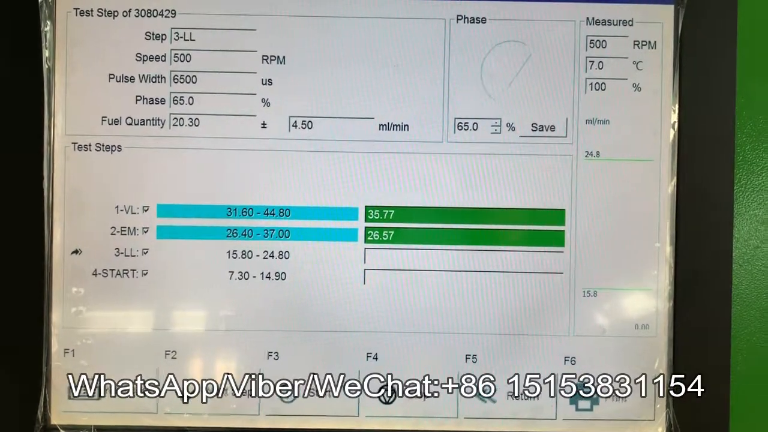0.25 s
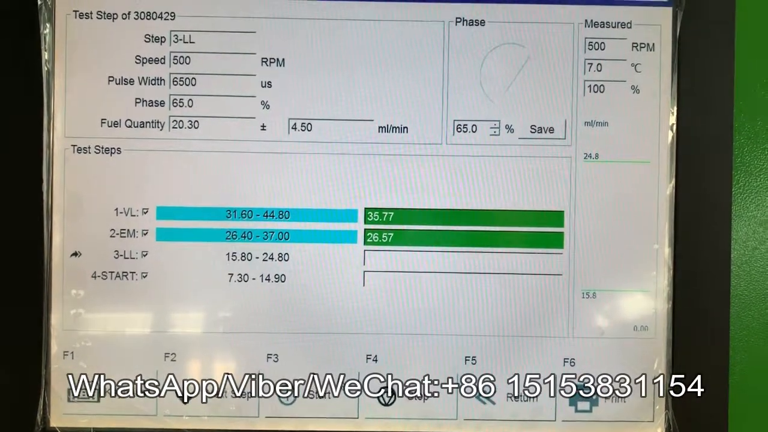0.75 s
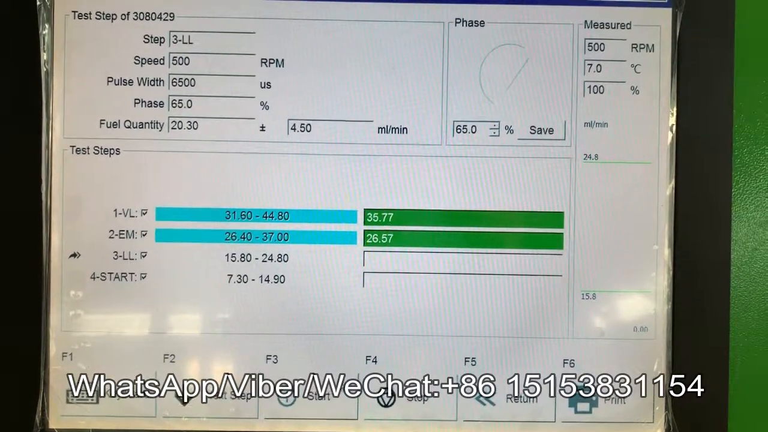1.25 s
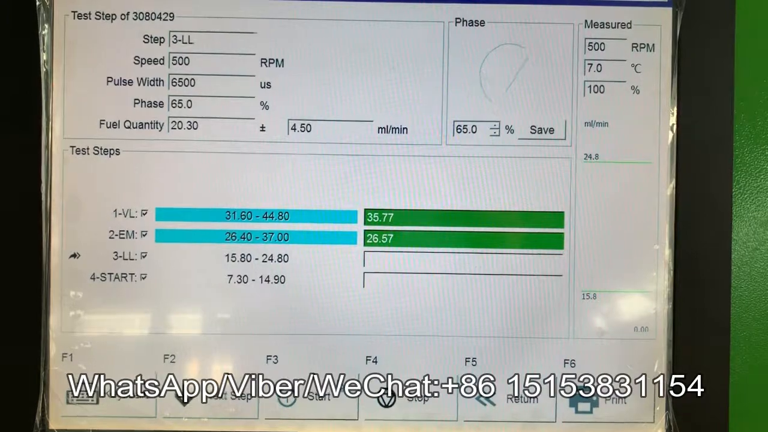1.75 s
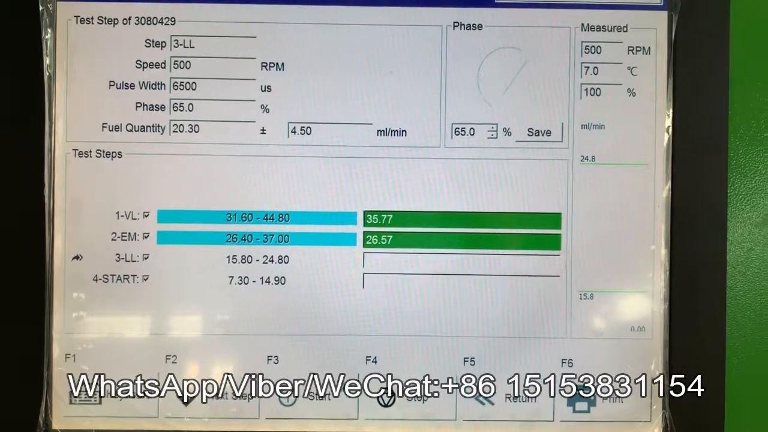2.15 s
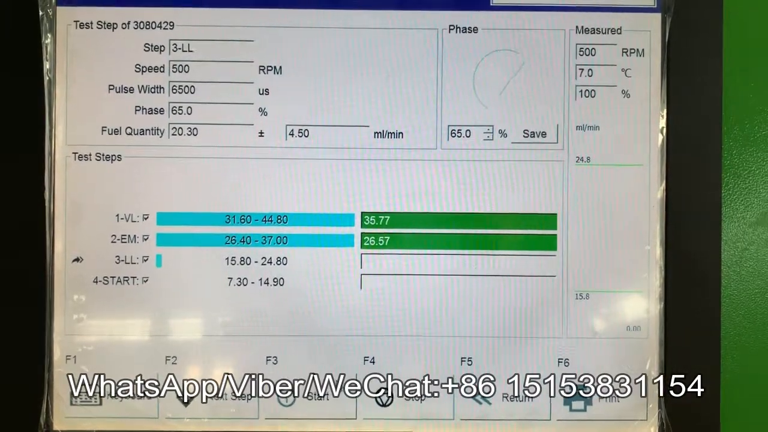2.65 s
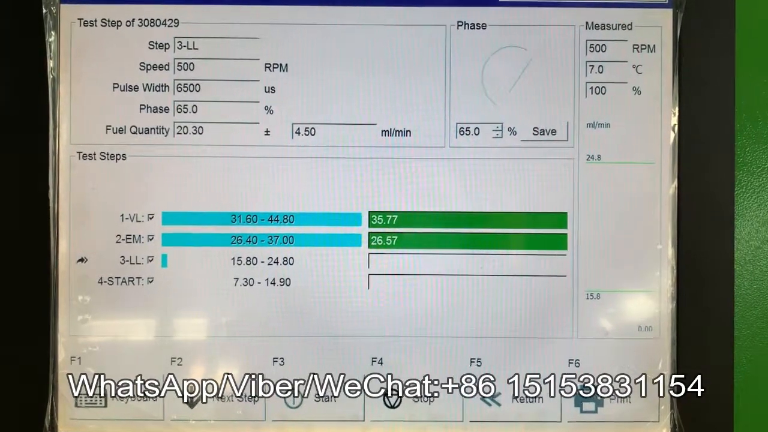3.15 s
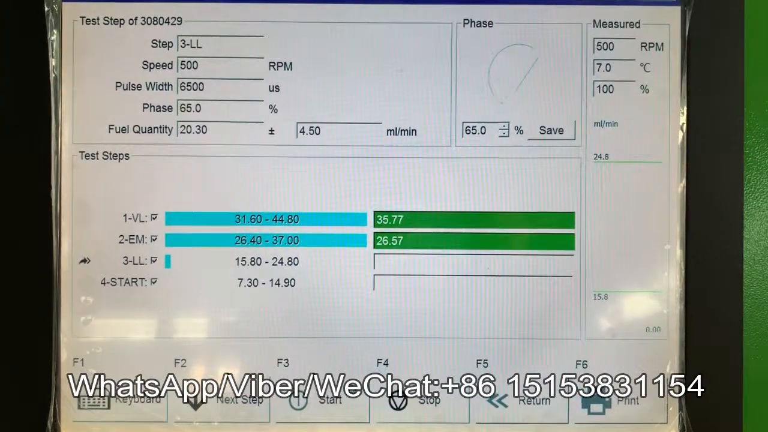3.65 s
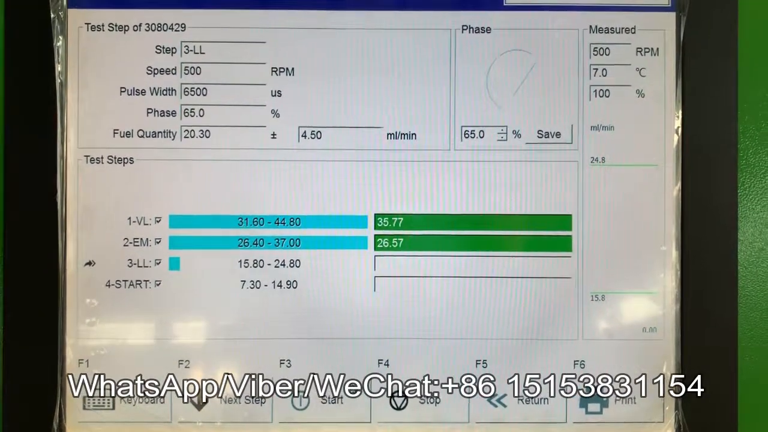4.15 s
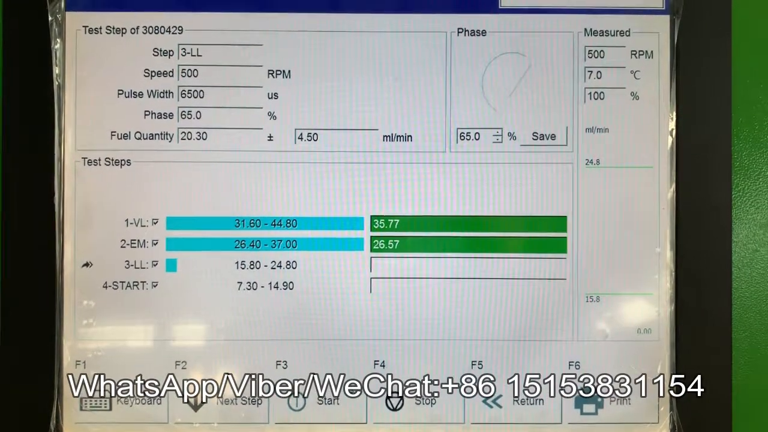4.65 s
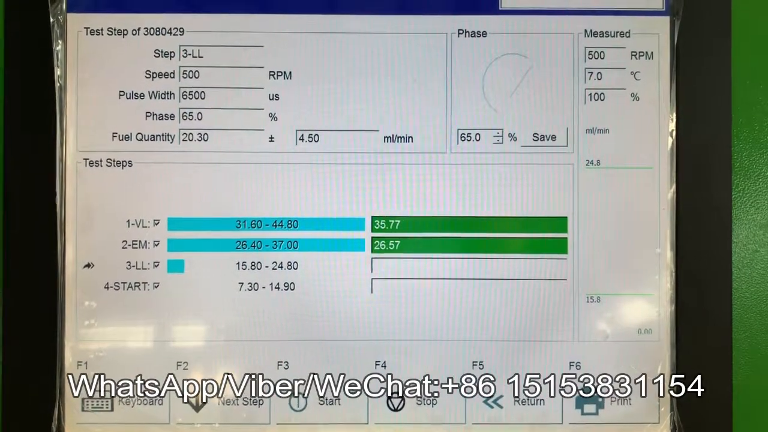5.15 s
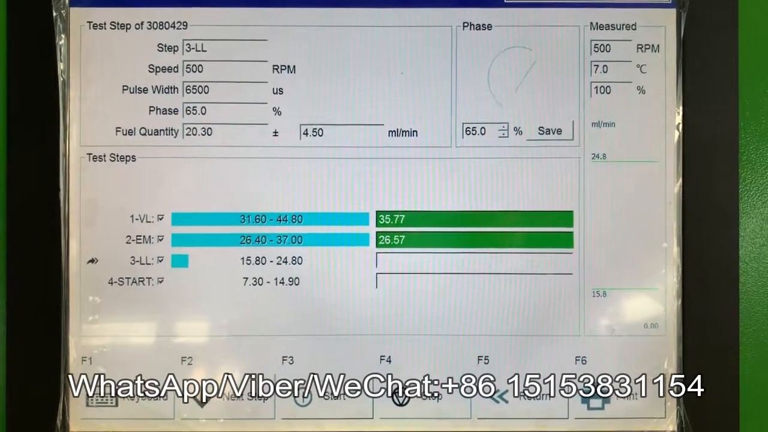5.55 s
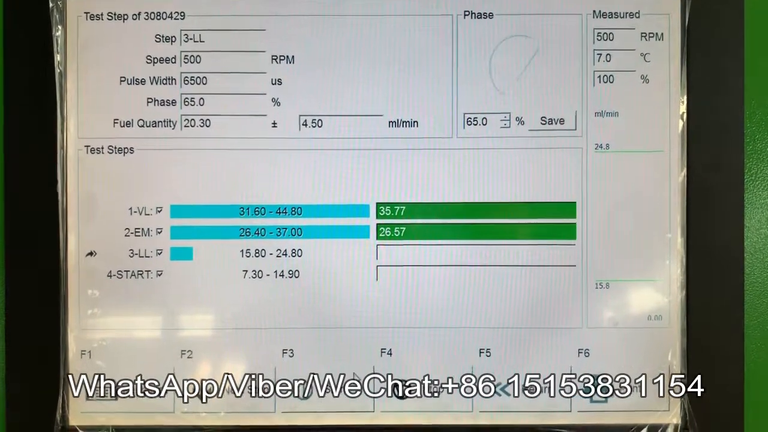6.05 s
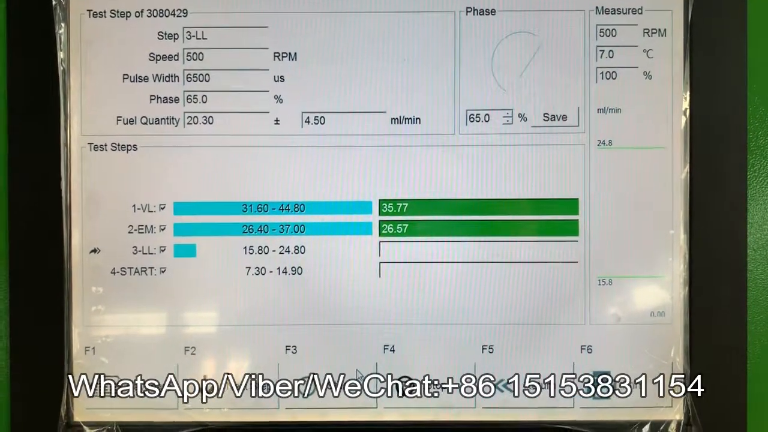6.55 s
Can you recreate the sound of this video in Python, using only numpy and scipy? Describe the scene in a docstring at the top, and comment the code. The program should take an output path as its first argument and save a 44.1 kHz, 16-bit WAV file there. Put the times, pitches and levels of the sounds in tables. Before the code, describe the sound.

Rapid, even mechanical knocking with bright clicks and ringing metal, above constant machine drone, oil hiss and faint distant rushing swells.

```python
"""A hard tick and thump recur about eight times a second: a diesel injector on a workshop test bench,
fired once a turn by a cam at 500 rpm. Valve contacts ring the steel, pressure pushes shake the frame's modes.
Between strokes the drive gear whines by tooth mesh, sagging and recovering with the cam load.
Motor and pump hum in steady tones, an inverter sings high up, oil hisses and thin metal squeaks;
behind them swells of filtered noise and a few low falling groans come from the hall."""
import sys
import numpy as np
from scipy import signal
from scipy.fft import rfft, irfft, next_fast_len
from scipy.io import wavfile
from scipy.ndimage import uniform_filter1d, map_coordinates

SR = 44100
rng = np.random.default_rng(int(sys.argv[2]) if len(sys.argv) > 2 else 0)


def write(x):
    x = np.atleast_2d(x).T
    wavfile.write(sys.argv[1], SR, np.round(np.clip(x, -1, 1) * 32767).astype(np.int16))

N = 300321  # samples
SHIFT_S = 5.33  # from here on the frame rings with another balance of its modes


def amp(db):
    """Level law: decibels to an amplitude ratio."""
    return 10 ** (np.asarray(db) / 20)


def unit(x):
    """Normalisation: scale a signal to rms 1."""
    return x / np.sqrt(np.mean(x ** 2) + 1e-20)


def along(points, hz):
    """Interpolation of (frequency [Hz], value) points on a logarithmic frequency axis."""
    f, v = np.transpose(points)
    return np.interp(np.log(hz + 1), np.log(f), v)


def curve(rows, x):
    """Linear interpolation of every column over the first one, read at x."""
    knots, *columns = np.transpose(rows)
    return [np.interp(x, knots, column) for column in columns]


def wobble(rate):
    """Band-limited random modulation: a smooth curve through `rate` random knots a second."""
    knots = rng.standard_normal(int(N * rate / SR) + 4)
    return map_coordinates(knots, [np.arange(N) * rate / SR])


def filtered(x, response):
    """Linear filtering: multiply the spectrum of x by a response of frequency."""
    m = next_fast_len(N + SR // 4)
    return irfft(rfft(x, m) * response(np.fft.rfftfreq(m, 1 / SR)), m)[..., :N]


def white():
    """White noise: two unrelated channels."""
    return rng.standard_normal((2, N))


def bell(t, centre, half):
    """Gaussian envelope, falling to 1/e at `half` seconds from its centre."""
    return np.exp(-((t - centre) / half) ** 2)


def resonances(modes, hz):
    """Modal superposition: response of damped modes (frequency [Hz], width [Hz], level [dB])."""
    total = 0
    for k, (centre, width, db) in enumerate(modes):
        damping = 1j * hz * width
        total = total + (-1) ** k * amp(db) * damping / (centre * centre - hz * hz + damping)
    return total


# likeness of the left and right sound in a diffuse field: (frequency [Hz], coherence [1])
COHERENCE = [(30, 1), (120, 0.93), (280, 0.9), (550, 0.97), (1000, 0.71), (2000, 0.51), (5000, 0.038),
             (8000, 0.59), (10500, 1), (14000, 0.86)]


def spread(pair, spectrum):
    """Interaural coherence: mix two unrelated signals into one coloured stereo sound of rms 1."""
    def mid_side_gain(hz):
        turn = np.arccos(np.clip(along(COHERENCE, hz), -1, 1)) / 2
        return amp(along(spectrum, hz)) * [np.cos(turn), np.sin(turn)]

    mid, side = filtered(pair, mid_side_gain)
    return unit(np.array([mid + side, mid - side]))


def ringing(age, rise, t60, repeat, count=6):
    """High modal density: noise struck once a turn, a share of its power alike in every turn."""
    t = np.arange(int(age.max() * SR) + 1) / SR
    shape = (1 - np.exp(-t / rise)) * amp(-60 * t / t60) + 1e-6
    grain = rng.standard_normal((2, len(t)))
    for _ in range(count):  # spreads the modes evenly over frequency, then evens the level over time
        grain = irfft(np.exp(1j * np.angle(rfft(grain * shape))), len(t)) / shape
        grain /= np.sqrt(np.abs(uniform_filter1d(grain ** 2, size=300)) + 1e-20)
    at = (age * SR).astype(int)
    share = np.clip(repeat, 0, 1)
    return shape[at] * (np.sqrt(share) * grain[:, at] + np.sqrt(1 - share) * white())


# injector strokes, one a cam turn:
# (time [s], relative thump [dB], relative ring and rattle [dB], relative gear whine [dB])
INJECTOR_STROKES = [(-0.0107, -2, -0.5, 3.5), (0.109, 2, 1, 5), (0.2284, 2, 1, 2.5), (0.3481, 0.5, -2.0, 1),
                    (0.467, 2, -0.5, 3), (0.5871, 1, -1.5, -1), (0.7071, 1, -1, 1.5), (0.827, 3, 0, 3.5),
                    (0.9457, -0.5, -1, 1), (1.066, 2, 0, 3.5), (1.186, 0, -1, 4), (1.3061, 0.5, 1.5, 4.5),
                    (1.4249, 0.5, -1.5, 0), (1.5453, -0.5, -2, 2.5), (1.6649, 2.5, -0.5, 1.5),
                    (1.7847, 1, -1.5, 2), (1.9037, -0.5, -2, 0), (2.0234, 2.5, 1.0, 6),
                    (2.1431, 0, -3, -2.5), (2.2627, -1, -2, 1.5), (2.3819, 0, -2, -2.5),
                    (2.502, -0.5, -2, -2.5), (2.6221, 0.5, -1.5, 2), (2.7413, 1, 0, 4.5),
                    (2.8605, 0, -1.5, 1), (2.9806, 2.5, 0.5, 5), (3.1, 1.5, -2, -4), (3.2196, 0, -1.5, 3),
                    (3.3386, 1, -1, 2), (3.4588, 2, 1, 5), (3.5787, 1.5, 0.5, 2.5), (3.698, 0, 0, 3.5),
                    (3.8175, 1.5, 1, 5), (3.9372, 2, 0.5, 4.5), (4.0567, 0, -3, -1), (4.1762, 2.5, 0.5, 2),
                    (4.296, -0.5, -2.5, -1.5), (4.4156, 2, 1.5, 5), (4.5349, 1, -0.5, 2),
                    (4.6548, 2.5, 0, 2.5), (4.7748, 2, -0.5, 3), (4.8943, 2.5, 0, 2.5), (5.014, 3, 0, 1),
                    (5.133, 2.5, 0.5, 3), (5.2521, -1, -1, 2.5), (5.3722, 1.5, -1.5, -1),
                    (5.4922, 3.5, 0, 2), (5.6115, 0, 1, 4), (5.7304, -1.5, -0.5, 2), (5.8503, 2, -0.5, 3.5),
                    (5.9699, 2.5, 0, 3), (6.0894, 0.0, -0.5, 2.5), (6.2092, 1, -0.5, 2),
                    (6.3291, 1, -0.5, 2.5), (6.448, 2, 0.5, 3), (6.5676, 1.5, -0.5, 1.5),
                    (6.6873, 2.5, 0, 2.5)]


def cam(t):
    """Periodic excitation: turns of the cam, the number of its last stroke and the seconds since."""
    times = np.transpose(INJECTOR_STROKES)[0]
    next_time = 2 * times[-1] - times[-2]
    turns = np.interp(t, np.append(times, next_time), np.arange(len(times) + 1))
    stroke = np.minimum(turns.astype(int), len(times) - 1)
    return turns, stroke, np.maximum(t - times[stroke], 0)


def swells(rows, t, attack, release):
    """Envelope of events (start [s], hold [s], level [dB]): linear rise, hold, exponential decay."""
    total = 0
    for start, hold, db in rows:
        rise = np.clip((t - start) / attack, 0, 1)
        total = total + amp(db) * rise * np.exp(-np.maximum(t - start - attack - hold, 0) / release)
    return total


# spectra of running noise, oil hiss, distant rush and low boom: (frequency [Hz], relative level [dB])
RUNNING_SPECTRUM = [(32, -32), (50, -11), (62, -32.5), (100, -1.5), (150, -10), (220, 5.5), (310, -1.5),
                    (450, -2.5), (600, 0), (720, -7.5), (960, -3.5), (1300, -14.5), (1600, -12.5),
                    (2400, -35.5), (5000, -45), (9000, -52)]
HISS_SPECTRUM = [(2000, 10), (4500, -9), (6500, 3), (8000, 9.5), (9500, 3), (12000, -3), (13300, -8),
                 (13800, 17), (14150, 13), (14700, -7), (15600, -8), (16200, -40)]
RUSH_SPECTRUM = [(150, 3.5), (350, -11), (700, -4.5), (930, 5.5), (1600, -2), (2500, -7), (4200, -14),
                 (6000, -22.5), (13000, -34), (16000, -56)]
BOOM_SPECTRUM = [(40, -15), (80, 3.5), (140, 2), (280, -3), (450, 0.5), (1000, -24.5)]
# swells of a distant rushing noise: (start [s], hold [s], level [dB])
RUSH_SWELLS = [(.57, 0.43, -25.5), (2.97, 0.019, -40), (3.6, 0.047, -36), (5.6, 0.073, -27.5),
               (6.1, 0.42, -40)]
# low swell under the first rush: (start [s], hold [s], level [dB])
BOOM_SWELLS = [(.73, 0.19, -26.5)]
# low groans within the first rush:
# (centre [s], half length [s], frequency at the centre [Hz], fall [octaves/s], peak level [dB])
FALLING_GROANS = [(.78, 0.018, 203.6, 16, -22), (0.83, 0.018, 120, 12, -21),
                  (0.898, 0.05, 155.6, 10, -22.5), (0.917, 0.088, 282, .1, -22)]
RUSH_FLOOR_DB, RUSH_ATTACK_S, RUSH_RELEASE_S = -38, 0.092, 0.33
BOOM_FLOOR_DB, BOOM_ATTACK_S, BOOM_RELEASE_S = -45, 0.15, .06


def workshop(t, age):
    """Incoherent addition: running noise of the bench, oil hiss, and swells from the hall."""
    struck = ringing(age, rise=0.000051, t60=2.45, repeat=0.61)
    running = amp(-23.5) * spread(struck, RUNNING_SPECTRUM)
    hiss = amp(-43.5) * spread(white(), HISS_SPECTRUM)
    # floor and swell add in power
    rush_gain = np.hypot(amp(RUSH_FLOOR_DB), swells(RUSH_SWELLS, t, RUSH_ATTACK_S, RUSH_RELEASE_S))
    boom_gain = np.hypot(amp(BOOM_FLOOR_DB), swells(BOOM_SWELLS, t, BOOM_ATTACK_S, BOOM_RELEASE_S))
    flutter = amp(1.84 * wobble(27) + 0.37 * wobble(95))
    rush = rush_gain * flutter * spread(white(), RUSH_SPECTRUM)
    boom = boom_gain * spread(white(), BOOM_SPECTRUM)
    groans = 0
    for s, half, hz, fall, db in FALLING_GROANS:
        cycles = np.cumsum(hz * 2 ** (fall * (s - t))) / SR
        groans = groans + amp(db) * bell(t, s, half) * np.sin(2 * np.pi * cycles)
    return running + hiss + groans + rush + boom


# thin metallic squeaks: (centre [s], half length [s], frequency [Hz], peak level [dB])
METAL_SQUEAKS = [(3.075, .026, 4430, -43), (3.2, .08, 4430, -54), (3.78, .012, 7920, -36),
                 (3.78, .06, 9372, -42), (3.8, .07, 9900, -50), (3.8, .05, 9125, -51),
                 (3.8, .07, 4651, -48), (3.77, .05, 5421, -46)]


def squeak(t):
    """Phase-modulated tone bursts: faint, thin metallic squeaks with an unsteady pitch."""
    total = 0
    for s, half, hz, db in METAL_SQUEAKS:
        total = total + amp(db) * bell(t, s, half) * np.sin(2 * np.pi * hz * t + 0.5 * wobble(180))
    return total


# hum of motor and pump: (frequency [Hz], rms level [dB])
HUM_LINES = [(25.08, -50), (33.45, -35.5), (50.17, -44.5), (83.6, -37), (117.06, -40), (167.2, -35),
             (211.8, -33), (284.3, -38), (342.8, -44.5), (351.2, -34), (376.3, -37.5)]
# whistle of the inverter: (frequency [Hz], rms level [dB])
INVERTER_LINES = [(13734, -65), (14236, -65)]


def drive(t):
    """Line spectrum: motor and pump hum, slightly unsteady, under the inverter's whistle."""
    def tone(hz, drift):  # rms 1, random starting phase, drift in radians
        return np.sqrt(2) * np.sin(2 * np.pi * (hz * t + rng.random()) + drift * wobble(3.1))

    hum = sum(amp(db + 1.0 * wobble(18)) * tone(hz, 0.076) for hz, db in HUM_LINES)
    whistle = sum(amp(db) * tone(hz, 0.13) for hz, db in INVERTER_LINES)
    sway = 1.2 * np.sin(2 * np.pi * 33.5 * t)
    switching = amp(-45.5) * np.sin(2 * np.pi * 14002 * t + sway)
    return hum + switching + whistle


# the teeth bear harder and slacken in turn as the shaft swings:
# (time after the stroke [s], half length [s], level over the whine [dB])
TOOTH_LOAD_BUMPS = [(0.028, 0.0051, 8), (0.039, 0.0026, 2.5), (0.058, 0.0075, 5.5), (0.11, 0.005, -7.5)]
# how the gear housing passes the whine:
# (frequency [Hz], gain before the ring shifts [dB], gain after [dB])
HOUSING_GAIN = [(528, -1.5, 1.5), (547, -4.5, -4.5), (560, 2.5, 5), (573, -5, -5.5), (588, -1.5, -2.5),
                (603, 2, -0.5), (640, 1, -1)]
WHINE_DB = -25.5  # base level before stroke, load and housing gains
# each stroke brakes the shaft, which then swings back and forth:
# rate, depth in mesh pitch before averaging, time of the first dip, decay constant
SWING_HZ, SWING_DEPTH_HZ, SWING_LAG_S, SWING_DECAY_S = 13.69, 52.5, -0.0052, 0.13
SWING_AFTER_SHIFT = 0.88  # share of the swing left once the ring has shifted


def gear(t, turns, age, whine_db, teeth_count=69):
    """Tooth-mesh tone: torsional swing bends its pitch, tooth load sets its level, housing colours it."""
    swing = np.cos(2 * np.pi * SWING_HZ * (age - SWING_LAG_S))
    swing_hz = -SWING_DEPTH_HZ * np.exp(-age / SWING_DECAY_S) * swing
    lead = np.cumsum(swing_hz - swing_hz.mean()) / SR  # teeth ahead of an evenly turning shaft
    lead -= uniform_filter1d(lead, size=round(N / np.ptp(turns)))  # no drift over a turn
    lead *= np.interp(t, [SHIFT_S, SHIFT_S + .1], [1, SWING_AFTER_SHIFT])
    # the teeth seat anew after each stroke
    db = WHINE_DB + np.interp(turns, np.arange(len(whine_db)) + .5, whine_db)
    db = db + sum(over * bell(age, s, half) for s, half, over in TOOTH_LOAD_BUMPS)
    teeth_passed = teeth_count * turns + lead + 0.058 * wobble(10.0)
    mesh = amp(db) * np.sqrt(2) * np.sin(2 * np.pi * teeth_passed)
    before, after = filtered(mesh, lambda hz: amp(curve(HOUSING_GAIN, hz)))
    return before + (after - before) * np.interp(t, [SHIFT_S, SHIFT_S + .1], [0, 1])


# modes of frame and panels:
# (frequency [Hz], relative level before the ring shifts [dB], relative level after [dB])
FRAME_MODES = [(348, -17.5, -18), (398.5, -19, -17), (454, -18, -19), (497.3, -18, -25), (517.7, -25, -23),
               (618.8, -16.5, -26), (733.5, -18.5, -32), (764.3, -18, -34), (796, -23.5, -30),
               (809, -23, -24), (883, -26, -17.5), (917, -25, -18.5), (932, -21.5, -17), (947, -21.5, -17),
               (974.5, -18.5, -19), (1037, -22.5, -25), (1088, -19, -23), (1095, -20.5, -28),
               (1162, -24, -28), (1193.7, -18, -22), (1433, -25.5, -24), (1527, -25, -31), (1687, -33, -35),
               (1788, -27.5, -28), (2720, -38, -39), (2820, -40, -39), (2890, -38, -39)]
# the way the teeth seat favours some modes: (frequency [Hz], gain per extra whine [dB/dB])
SEATING_GAIN = [(350, -1.1), (470, 0), (770, -1.44), (935, 1.3), (1100, -1.25), (1450, -0.4), (1750, 1),
                (2800, 1.5)]
# spectrum of the many weaker modes between them: (frequency [Hz], relative level [dB])
SHAKE_SPECTRUM = [(150, -17), (330, -8.5), (500, -4), (700, -19), (950, -6.5), (1250, -8), (1750, -5),
                  (2200, -20.5), (4000, -37.5)]
# spectrum of the rattling small parts: (frequency [Hz], relative level [dB])
RATTLE_SPECTRUM = [(900, -22), (1800, 6.5), (2300, 5), (2850, 6), (3400, 0.5), (5600, 2), (7400, -1.5),
                   (9400, -1), (10700, -5.5), (12400, -1.5), (14000, -12), (15500, -3), (16300, -39)]
FRAME_DELAY_S, FRAME_RISE_S, FRAME_T60_S = 0.00399, 0.0088, 0.13  # the ring sets in with the thump
# scatter from stroke to stroke, and between the microphone ports
MODE_SCATTER_DB, MODE_SCATTER_RAD, PORT_SCATTER_RAD = 2.2, 0.45, 0.5


def frame(stroke, age, whine_db):
    """Modal decay: frame and panels ring after each stroke; small parts rattle above them."""
    shifted = np.transpose(INJECTOR_STROKES)[0] > SHIFT_S
    since = np.maximum(age - FRAME_DELAY_S, 0)
    seated_db = whine_db - whine_db.mean()
    modes = np.zeros((2, N))
    for k, (hz, before_db, after_db) in enumerate(FRAME_MODES):
        size, turn, apart = rng.standard_normal((3, len(INJECTOR_STROKES)))
        db = np.where(shifted, after_db, before_db) + along(SEATING_GAIN, hz) * seated_db
        gain = amp(db + MODE_SCATTER_DB * size)
        phase = MODE_SCATTER_RAD * turn + PORT_SCATTER_RAD * np.array([apart, -apart])
        sign = (-1) ** k  # neighbours swing opposite ways
        modes += sign * gain[stroke] * np.sin(2 * np.pi * hz * since + phase[:, stroke])
    modes *= (1 - np.exp(-since / FRAME_RISE_S)) * amp(-60 * since / FRAME_T60_S)
    shake = spread(ringing(age, rise=0.0058, t60=0.17, repeat=.5), SHAKE_SPECTRUM)
    clatter = amp(1.26 * wobble(300))  # loose parts touch in uneven bursts
    rattle = spread(clatter * ringing(age, rise=0.0077, t60=0.15, repeat=0.46), RATTLE_SPECTRUM)
    return modes + amp(-31.5) * shake + amp(-34.5) * rattle


# pushes on the frame within one stroke, a deep one, a hard one and its recoils:
# (time after the stroke [s], frequency [Hz], half length [s], relative level [dB])
FRAME_PUSHES = [(0.00502, 507, 0.0031, -9), (0.004925, 990, 0.00043, -12), (0.0147, 850, 0.0014, -24),
                (0.023, 800, 0.0016, -18), (0.046, 1030, 0.0025, -25)]


def thump(age):
    """Impulsive forcing: the fuel pressure lets go in short heavy pushes on the frame."""
    total = 0
    for s, hz, half, db in FRAME_PUSHES:
        total = total + amp(db) * bell(age, s, half) * np.sin(2 * np.pi * hz * (s - age))
    return total


# valve contacts within one stroke:
# (time after the stroke [s], relative level [dB], lowering of the ring's pitch [%])
VALVE_CONTACTS = [(0, 7.5, 0.3), (.0023, 0.5, 0.7), (.0056, -5.5, 3.5)]
# modes of the injector steel:
# (frequency [Hz], relative left level [dB], relative right level [dB], 60 dB decay time [s])
STEEL_MODES = [(6500, -26.5, -19.5, 0.016), (6435, -29.5, -21, 0.019)]
# spectrum of the valve's snap, bright and broad: (frequency [Hz], relative level [dB])
SNAP_SPECTRUM = [(5000, -16), (8500, -20), (10600, -4), (11800, -10), (12400, 3), (13100, -2), (13800, -8),
                 (14700, -4), (15400, -1), (15900, -20), (16300, -28)]
TICK_RISE_S, TICK_SCATTER_DB, REBOUND_SCATTER_S = 0.00049, 2, 0.000241
SNAP_DB, SNAP_T60_S, SNAP_ECHO_DB = -25, 0.0087, -41.5  # levels relative to the stroke


def injector(stroke, age):
    """Impact excitation: the plunger sings as it loads, the valve snaps and rebounds, its steel rings."""
    steel, blows = np.zeros((2, N)), np.zeros(N)
    count = len(INJECTOR_STROKES)
    for contact, (s, db, lowering) in enumerate(VALVE_CONTACTS):
        # only the rebounds scatter in time
        scatter = (contact > 0) * REBOUND_SCATTER_S * rng.standard_normal(count)
        late = age - s - scatter[stroke]
        on = np.flatnonzero((late > 0) & (age < .03))
        t, k = late[on], stroke[on]
        rise = 1 - np.exp(-(t / TICK_RISE_S) ** 2)
        for hz, left_db, right_db, t60 in STEEL_MODES:
            size, detune = rng.standard_normal((2, count))
            pitch = hz * (1 - lowering / 100 + .013 * detune[k])
            decay = amp(db + TICK_SCATTER_DB * size[k] - 60 * t / t60)
            steel[:, on] += amp([[left_db], [right_db]]) * rise * decay * np.sin(2 * np.pi * pitch * t)
        # each blow is as strong as the last steel mode it strikes
        blows[on] += amp(db + TICK_SCATTER_DB * size[k] - 60 * t / SNAP_T60_S)
    blows_rms = np.sqrt(np.mean(blows ** 2))
    snap = amp(SNAP_DB) * blows_rms * spread(blows * white(), SNAP_SPECTRUM)
    # off the nearby metal
    echo = amp(SNAP_ECHO_DB) * spread(ringing(age, rise=0.0028, t60=0.047, repeat=.85), SNAP_SPECTRUM)
    period = np.diff(INJECTOR_STROKES, axis=0)[:, 0].mean()
    loading = amp(-60 * np.abs(period - age) / 0.03)  # grows until the valve snaps
    song = unit(filtered(white(), lambda hz: resonances([(6300, 750, 0)], hz) ** 2))
    steel_only = signal.butter(4, 5200, "high", fs=SR, output="sos")
    return signal.sosfilt(steel_only, steel) + snap + echo + amp([[-35], [-29]]) * loading * song


TICK_FOLLOWS = 0.7  # share of the thump's dB that the tick follows


def scene():
    """Superposition: the cam fires once a turn; a weak stroke both ticks and knocks less."""
    t = np.arange(N) / SR
    turns, stroke, age = cam(t)
    _, thump_db, ring_db, whine_db = np.transpose(INJECTOR_STROKES)
    background = workshop(t, age) + squeak(t) + drive(t)
    whine = gear(t, turns, age, whine_db)
    ring = amp(ring_db[stroke]) * frame(stroke, age, whine_db)
    knocks = amp(thump_db[stroke] - 0.74) * thump(age)
    ticks = amp(TICK_FOLLOWS * thump_db[stroke]) * injector(stroke, age)
    return background + whine + ring + knocks + ticks


# phase between the two microphone ports: (frequency [Hz], lead of the left port [rad])
PORT_PHASE = [(0, 0), (600, -.7), (2240, -2), (4130, -.1), (5600, 2.2), (6400, 1.3), (7840, -.1),
              (9820, -2.9), (10900, -3.3), (13100, -6.1), (14400, -6.5), (15800, -8.6)]
TOP_HZ = 16400


def record(dry):
    """Interchannel phase: two spaced ports hear the sound shifted apart; the top is cut off."""
    def response(hz):
        half_lead = curve(PORT_PHASE, hz)[0] * np.array([[.5], [-.5]])
        return np.exp(1j * half_lead) * (hz < TOP_HZ)

    return filtered(dry, response)


dry = scene()
out = record(dry)
write(out)
```